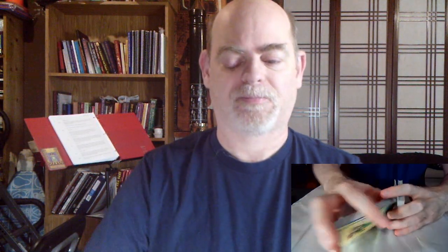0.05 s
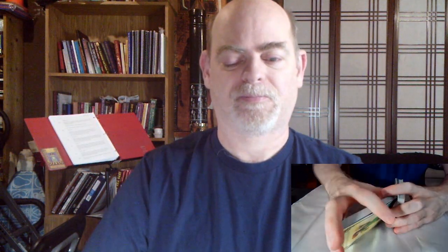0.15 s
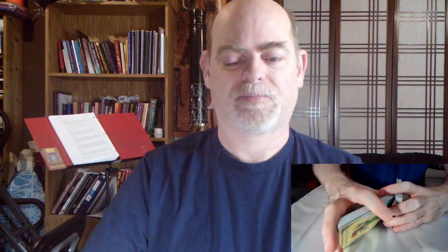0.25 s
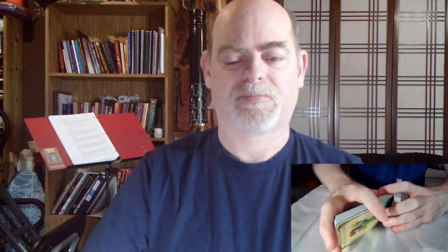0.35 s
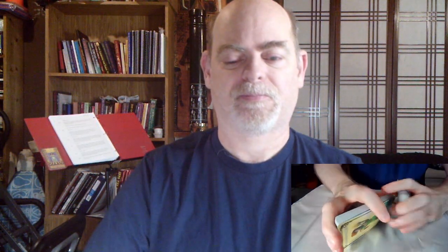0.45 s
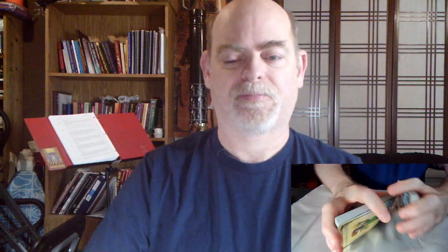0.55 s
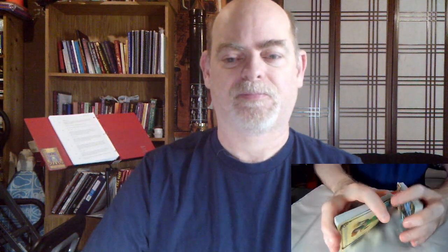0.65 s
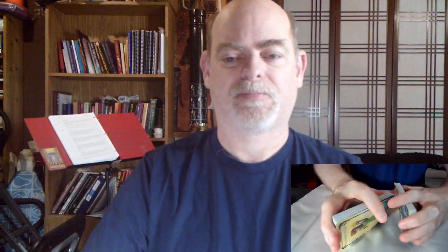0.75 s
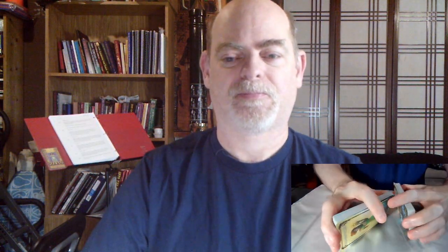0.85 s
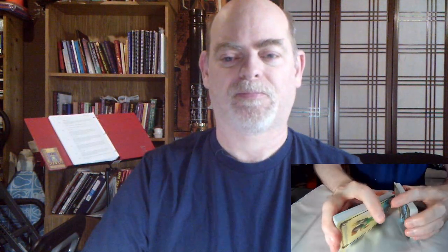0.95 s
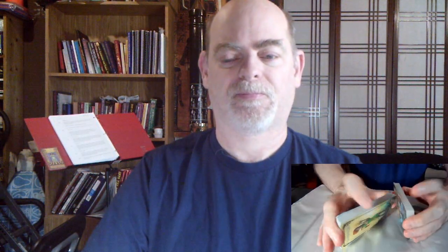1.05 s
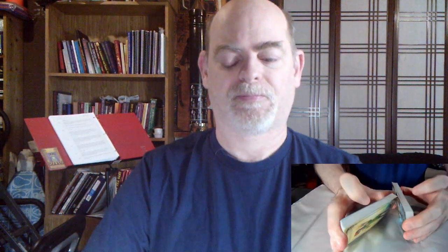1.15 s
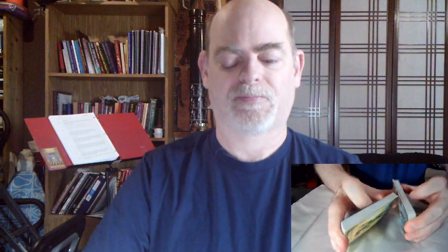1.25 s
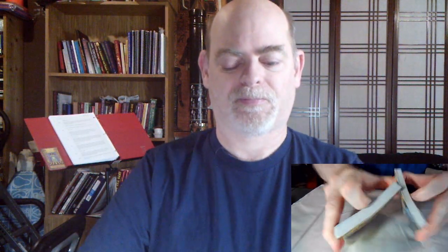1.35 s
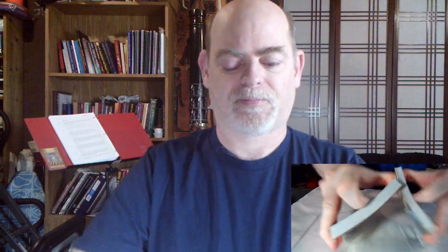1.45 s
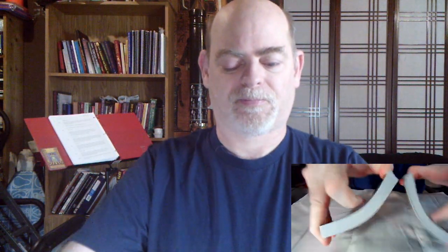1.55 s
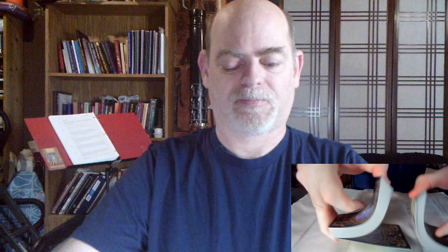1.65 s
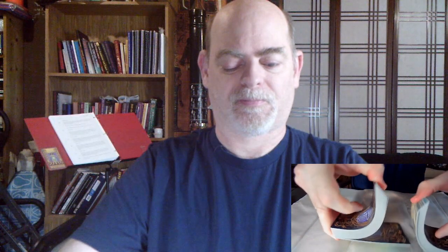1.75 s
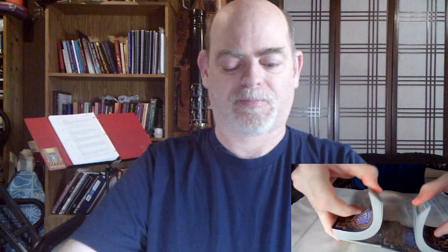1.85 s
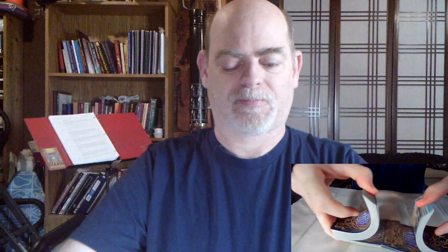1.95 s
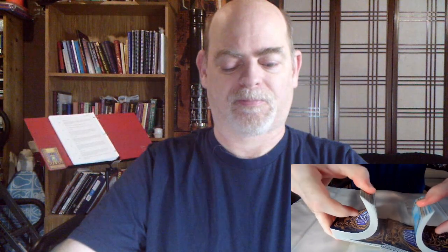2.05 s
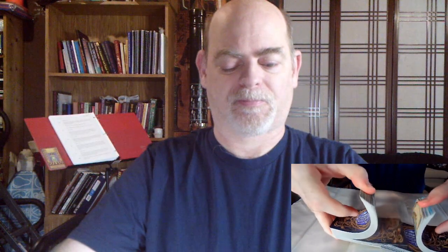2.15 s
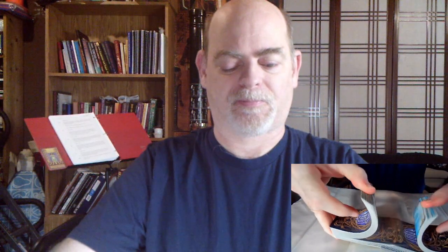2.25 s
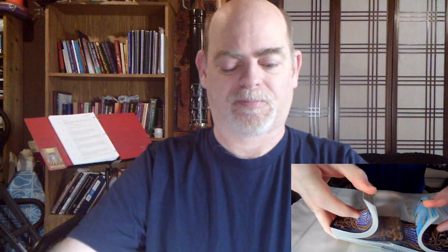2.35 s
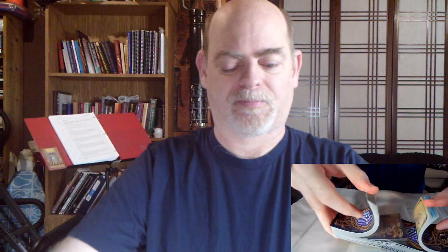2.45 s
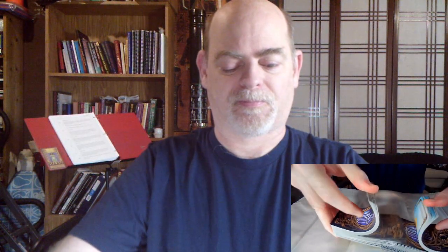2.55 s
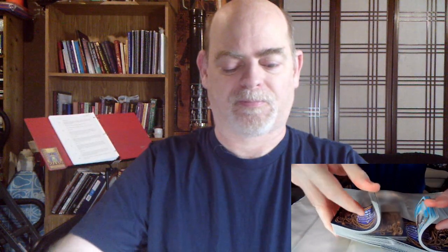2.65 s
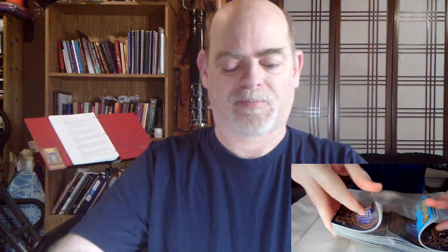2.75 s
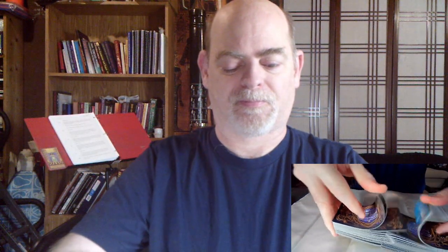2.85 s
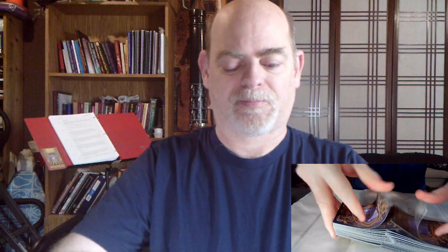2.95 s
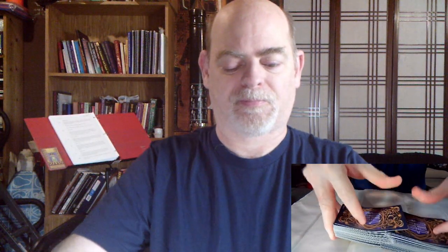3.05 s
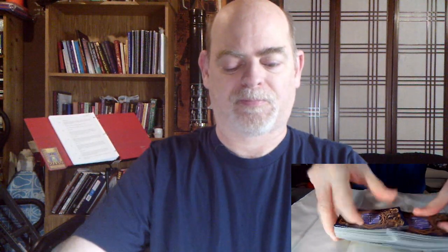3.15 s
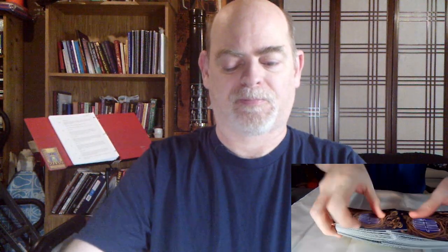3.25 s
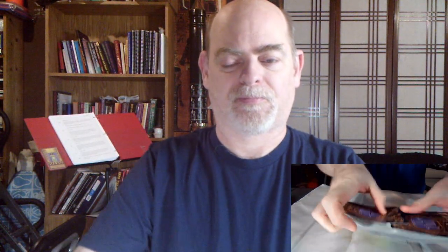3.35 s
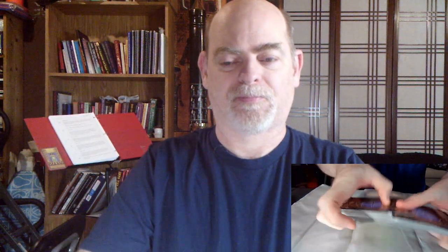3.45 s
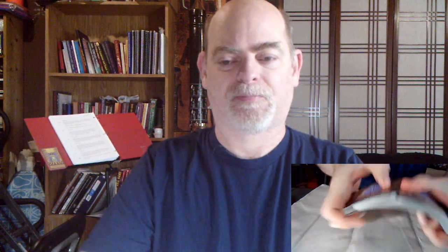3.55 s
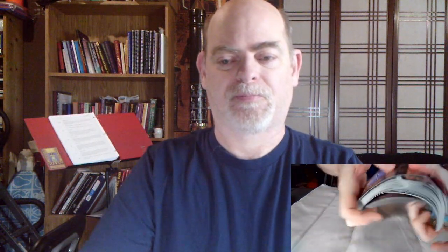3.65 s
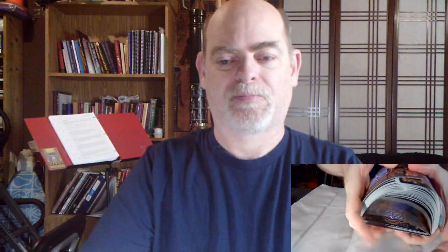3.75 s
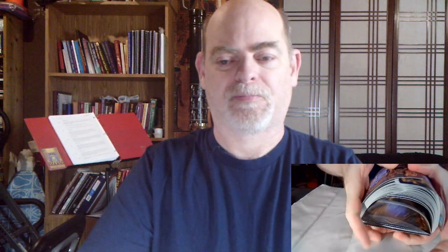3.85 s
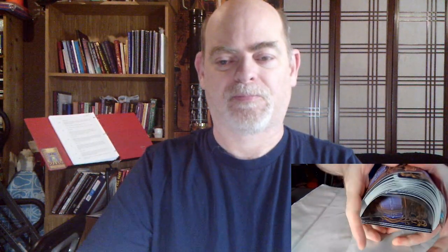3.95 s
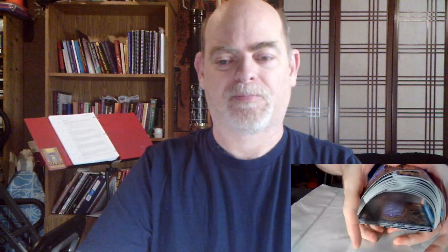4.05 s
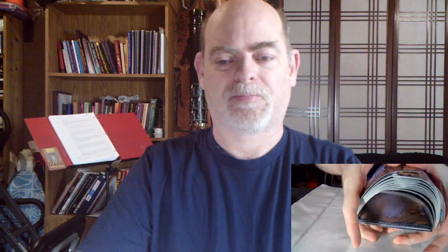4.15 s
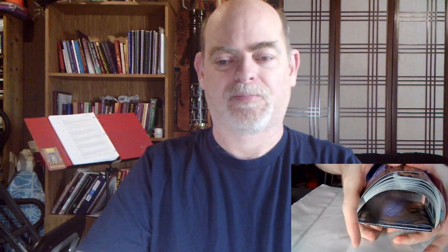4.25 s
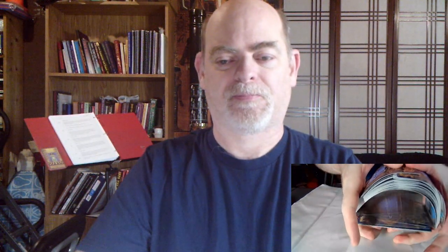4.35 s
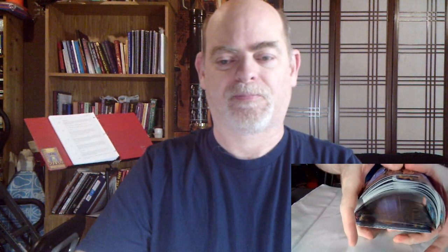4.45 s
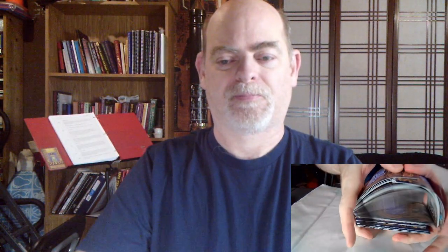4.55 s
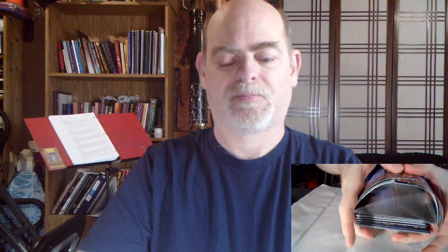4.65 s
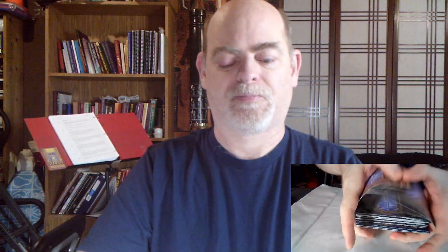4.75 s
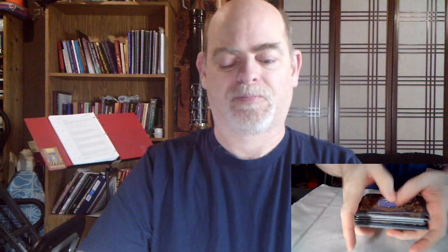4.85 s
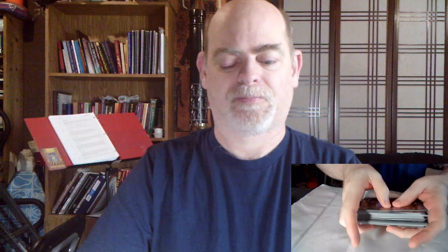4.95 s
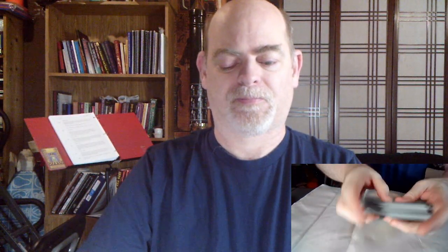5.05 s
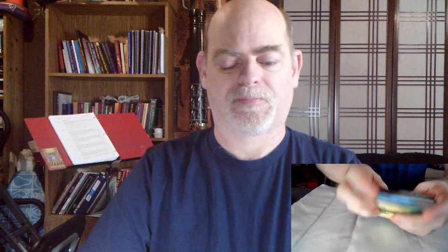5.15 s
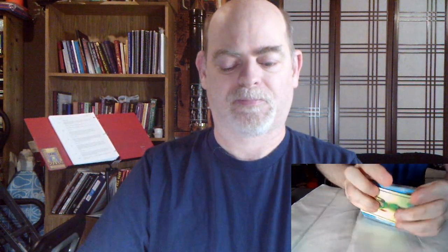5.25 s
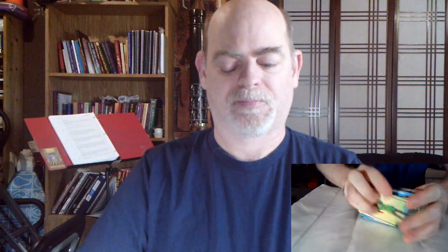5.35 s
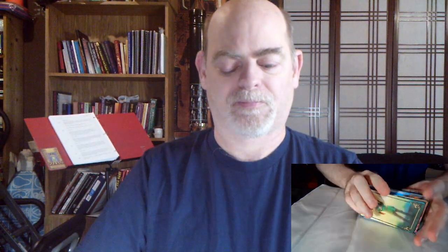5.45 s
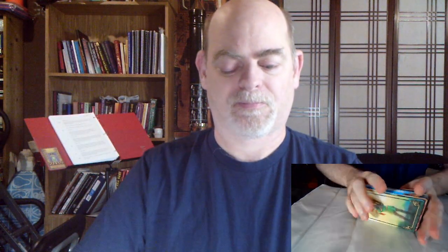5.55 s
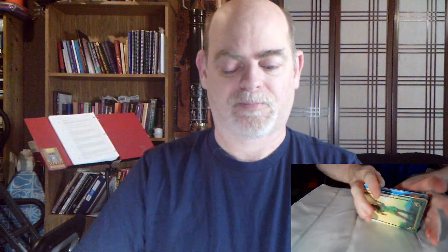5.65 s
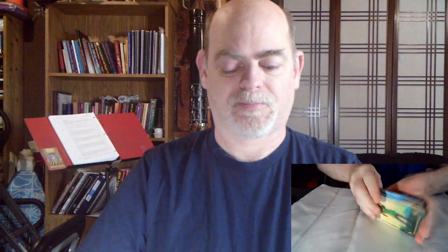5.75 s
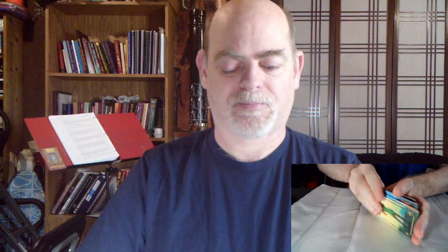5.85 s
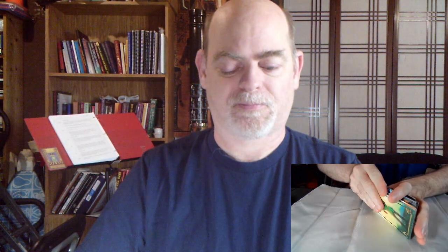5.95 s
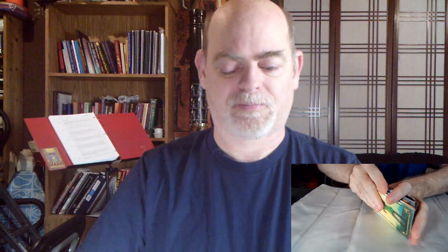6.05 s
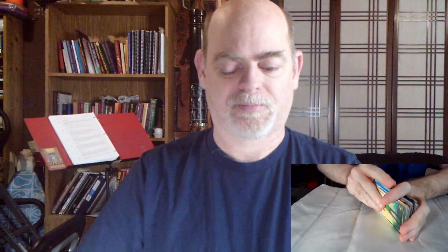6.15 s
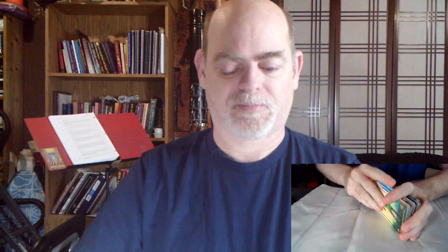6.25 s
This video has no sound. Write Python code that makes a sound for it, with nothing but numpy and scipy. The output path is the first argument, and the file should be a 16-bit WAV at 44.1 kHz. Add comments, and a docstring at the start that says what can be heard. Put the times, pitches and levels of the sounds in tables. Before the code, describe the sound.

Quiet handling and one low thump on a table lead into a sharp, uneven riffle of card corners, snapping and slapping over a low table rumble. A pause with soft bumps follows, then a gentle sliding purr that speeds into a brief crisp flutter. The deck is squared with light knocks. Close, fairly dry indoor pickup with short room echoes and steady faint noise.

```python
"""A small furnished room, close on a cloth-covered table that carries both the cards and the microphone.
A stiff deck is riffled, bridged and squared: card corners flick past the thumbs and slap down as noise
bursts through resonances, and sliding faces hiss as friction noise. Hands and deck thump the table, whose
top booms and whose frame rocks and sways. Room echoes follow the cards; a faint steady hush lies beneath."""
import sys
import numpy as np
from scipy import signal
from scipy.fft import rfft, irfft
from scipy.io import wavfile
from scipy.ndimage import uniform_filter1d

SR = 44100
rng = np.random.default_rng(int(sys.argv[2]) if len(sys.argv) > 2 else 0)


def output_pcm(signal):
    """Save a mono or channel-first signal as 16-bit PCM at the path in sys.argv[1].

    Samples are clipped to [-1, 1] before scaling.
    """
    pcm = np.clip(np.atleast_2d(signal).T, -1, 1) * 32767
    wavfile.write(sys.argv[1], SR, np.round(pcm).astype(np.int16))


N = 277410
T = np.arange(N) / SR  # [s]

# Cards heard singly, peak levels: (time [s], snap [dB], snap pitch [Hz], edge crackle above snap [dB],
# flat slap above snap [dB], contact [ms])
SINGLE_CARDS = [(1.371, -35, 2850, 3.5, -9, 0.31), (1.618, -53, 4000, 5.5, 2, 0.73),
                (1.662, -51, 2800, 2, 12, 4.1), (1.6921, -45, 4890, 14.5, 5, 0.15),
                (1.7164, -57, 2750, -7, 18.5, 1.5), (1.7484, -46, 2030, 1, 4.5, 0.22),
                (1.7863, -50.5, 2050, 6, 11, 0.62), (1.8076, -56, 2050, -1, 15.5, 0.94),
                (1.8208, -32.5, 2020, -5, 6.5, 0.57), (1.8451, -41, 2050, 7, 14.5, 0.77),
                (1.8763, -39.5, 2050, 0, 9.5, 16), (1.9024, -46, 2630, 15, 15.5, 0.17),
                (1.9465, -26, 3480, -3, -2.5, 0.52), (1.97, -32.5, 2770, 1, 5.5, 0.95),
                (1.99, -24, 4750, 8.5, -4, 0.51), (2.015, -36, 2280, 7, 7, 1.8),
                (2.0574, -23.5, 2600, 7, 0, 0.47), (2.08, -20.5, 4320, -6, -6.5, 2),
                (2.0907, -23.5, 2100, -5, -3, 3.4), (2.1362, -31.5, 2860, 10.5, 5, 0.41),
                (2.1594, -18.5, 2780, -14, -24, 3.4), (2.1664, -22, 2100, -7, -0.5, 10),
                (2.1964, -28, 1880, -9, -6, 1.3), (2.2278, -15, 2680, 1, -8.5, 0.48),
                (2.247, -35.5, 2050, 0, 9, 1.5), (2.259, -27, 1880, 0, -0.5, 1.3),
                (2.295, -41.5, 2050, 4, 12, 2.4), (2.328, -28.5, 1870, -10, -7, 2.3),
                (2.3459, -18.5, 4390, -2.5, -1, 1.5), (2.3558, -30, 3380, 6, -8, 2.1),
                (2.408, -40, 2050, -3, 8, 1.1), (2.421, -19, 2780, -4, -3, 0.48),
                (2.4593, -27, 2700, 1, 2.5, 1.5), (2.483, -33, 4000, -4, -7, 2.7),
                (2.498, -34, 2760, -11, 11, 3.6), (2.5287, -11.5, 4070, -4.5, -9, 0.5),
                (2.547, -32, 2050, 4, 8.5, 1.3), (2.5795, -21, 3950, -6, -1.5, 1.6),
                (2.6016, -26, 2050, -2, 4, 4.8), (2.647, -38, 4600, 14.5, -2, 2.4),
                (2.662, -29, 2050, -19, 9.5, 2.1), (2.691, -24.5, 2720, 2, 3.5, 0.17),
                (2.7389, -18.5, 2030, -1.5, 1, 0.22), (2.7583, -22.5, 1980, 0, 4, 5.2),
                (2.7745, -22.5, 4650, 1.5, 0.5, 3.5), (2.8198, -24, 2000, 4, -2, 0.93),
                (2.8402, -25.5, 4750, 4, 8, 1.14), (2.875, -34, 4770, 11.5, -5, 2.1),
                (2.8848, -30, 2670, 3.5, 6.5, 7.6), (2.9145, -25.5, 2450, 1.5, -0.5, 1.1),
                (2.9429, -31.5, 2680, 6.5, 3.5, 1.5), (2.9627, -34.5, 2050, -1, 2.5, 3.5),
                (2.9821, -36.5, 2050, 9.5, -0.5, 1.33), (3.2437, -50, 3930, 6, -11, 0.7),
                (3.822, -45, 2690, 2.5, -26.5, 2.7), (4.0895, -53, 2220, 2, 7, 3.2),
                (4.122, -44.5, 1870, 11, -2, 0.37), (4.1783, -45, 2060, 2, 4.5, 4),
                (4.225, -42.5, 2050, 0.5, -0.5, 4.9), (4.274, -28.5, 3500, -1.5, -17, 1.1),
                (4.29, -41, 2630, -12, -2, 2.1), (4.3001, -49, 3980, 17.5, -2, 0.91),
                (4.4392, -41.5, 2060, -9, 4, 1.4), (4.517, -32.5, 1900, -20, -1, 2.1),
                (4.554, -28, 2050, 0.5, -2, 1.1), (4.561, -33.5, 2050, 7, 0, 0.82),
                (4.5765, -38.5, 2761, 6, 8.5, 2.53), (4.5866, -20.5, 4400, -2, -3, 0.56),
                (4.5984, -36, 2050, 6, -11, 1.6), (4.6135, -41, 2750, 3, 11, 2.2),
                (4.621, -36, 2560, -4, 7, 1.2), (4.6276, -30, 2090, 3, 5.5, 2.8),
                (4.6419, -36, 2350, 5, 7, 0.41), (4.6827, -29.5, 2800, 3, -9, 2.8),
                (4.6953, -30.5, 4300, -16, 2.5, 2.9), (4.7037, -36, 2680, -5, -1, 2.4),
                (4.7334, -37.5, 2610, 4.5, 4.5, 4.3), (4.789, -45, 2000, 2, 2, 0.85),
                (5.605, -38.5, 2300, 1, -5.5, 0.14)]
# Softer cards falling between them: (start [s], end [s], snap at start [dB], snap at end [dB])
SOFT_RUNS = [(1.626, 1.812, -47.5, -58), (1.84, 2.989, -38.5, -36), (3.038, 3.195, -64, -58),
             (3.25, 3.5, -56, -66), (3.69, 4.071, -56, -66), (4.065, 4.459, -52.5, -49),
             (4.462, 4.79, -43, -46.5)]
# Density of each soft run: (rate [cards/s])
SOFT_RUN_RATES = [40, 45, 20, 30, 40, 45, 90]
# The average soft card and its chance spread; edge and slap stand relative to the snap
SOFT_EDGE_DB, SOFT_SLAP_DB, SOFT_CONTACT_MS, SOFT_SNAP_HZ = -0.5, 0, 2, 2590
SOFT_SPREAD_DB, SOFT_COLOUR_SPREAD_DB = 3, 5
# Resonances of a card: (frequency [Hz], width [Hz], level [dB])
SNAP_MODES = [(2000, 1200, 5.5), (3100, 640, 8.5), (3185, 88, 11), (4120, 580, 6)]  # corner coming free
EDGE_MODES = [(5550, 800, -3), (6700, 570, 2), (8530, 1530, -1.5), (12600, 4900, -7.5),
              (16540, 2500, -18.5)]  # crackle of the edge
SLAP_MODES = [(503, 333, -9), (839, 325, -1), (1030, 294, 0), (1432, 346, -3)]  # card landing flat
CORNER_DB = 5  # each card's own resonance stands out among the shared ones

# Card faces rubbing in the riffle, then in the bridge: (time [s], fine hiss [dB], coarse scrape [dB])
RIFFLE_RUB = [(1.781, -82, -75), (1.891, -58.5, -57.5), (2.06, -52.5, -55.5), (2.17, -50, -45),
              (2.24, -53, -50.5), (2.514, -60, -65.5), (2.544, -49, -47), (2.629, -61.5, -55),
              (2.78, -56.5, -47), (2.903, -52, -44), (2.98, -72.5, -64), (3.0, -83, -73), (3.2, -85, -89)]
BRIDGE_RUB = [(3.552, -81, -88), (3.66, -71, -64.5), (3.697, -57, -62), (3.746, -55.5, -57),
              (3.891, -53, -61), (4.136, -50, -58.5), (4.26, -58, -63), (4.29, -54, -59),
              (4.365, -54, -58.5), (4.46, -56, -66), (4.5, -48, -53), (4.66, -56, -48.5), (4.749, -44, -52),
              (4.785, -55, -57.5), (4.805, -71, -65), (4.914, -90, -90)]
# Fingers brushing the cards: (time [s], held [s], fine hiss [dB], coarse scrape [dB])
FINGER_BRUSHES = [(0.01, 0.064, -66.5, -66), (0.314, 0.0076, -70, -75), (1.003, 0.015, -75, -75),
                  (1.292, 0.0092, -80, -74), (1.387, 0.0046, -85, -83), (1.66, 0.021, -78, -62),
                  (3.258, .01, -80, -75), (3.3, 0.012, -67.5, -78), (3.36, 0.13, -75.5, -78),
                  (5.12, 0.038, -65, -93), (5.233, 0.17, -73.5, -73.5), (5.617, 0.0084, -69, -75),
                  (5.76, 0.026, -73, -68.5), (5.897, 0.029, -73.5, -70), (6.111, 0.029, -74, -73),
                  (6.27, .02, -68.5, -76)]
RISE_DB_PER_S, FALL_DB_PER_S = 293, 263
DRAG_S, DRAG_HELD_S, DRAG_DB, DRAG_STOP_DB_PER_S = 5.125, 0.097, -58.5, 1400  # one drag on the cloth
# Resonances under friction: (frequency [Hz], width [Hz], level [dB])
HISS_MODES = [(5700, 1000, -6), (6900, 800, 1.5), (8500, 1400, .5), (12200, 3000, -1), (14800, 2000, -3)]  # fine hiss of the glossy faces
SCRAPE_MODES = [(1950, 450, 1), (2920, 330, 0.1), (4250, 2600, -5)]  # coarse scrape
FACE_MODES = [(478, 230, -5), (1203, 520, -6)]  # card faces shaken by the scrape
CLOTH_MODES = [(1110, 300, -1), (2780, 350, 0), (4400, 700, -11), (6600, 1500, -17)]  # table cloth

# Deck or hand meeting the table, peak levels:
# (time [s], top [dB], frame rock [dB], push [ms], knock [dB])
TABLE_THUMPS = [(0.617, -38, -63, 7.7, -70.5), (0.669, -12.5, -41.5, 8.9, -39),
                (1.692, -37.5, -37.5, 10.3, -43.5), (1.879, -24, -40, 8.8, -49),
                (2.511, -24.5, -32, 13.5, -54), (3.29, -40.5, -48, 9.8, -75),
                (3.345, -37.5, -46, 15.5, -72), (3.526, -32.5, -55, 13.6, -80),
                (3.747, -24, -41, 10.1, -50), (4.146, -44, -47, 4.3, -89), (5.221, -37, -33, 1.2, -43),
                (5.241, -37, -48, 4.4, -52), (5.291, -26.5, -52, 2.8, -39.5), (5.31, -45, -38, 9.8, -55),
                (6.067, -39.5, -53, 6, -66.5)]
# Hands working on the table: (time [s], top [dB], frame rock [dB], sway of the legs [dB])
HAND_TREMOR = [(0.0, -49, -51, -39), (0.33, -52.5, -54, -44), (0.72, -50.5, -49.5, -36),
               (1.0, -52, -54, -47.5), (1.25, -49, -53, -37), (1.56, -54.5, -71, -58),
               (1.73, -46, -39, -44), (1.9, -36.5, -33, -31.5), (2.07, -34.5, -29.5, -30),
               (2.26, -33, -34, -32), (2.49, -28.5, -49, -38), (2.58, -27.5, -28, -26.5),
               (2.8, -26.5, -24, -24.5), (2.96, -40.5, -27, -35), (3.15, -55, -51, -30.5),
               (3.28, -52, -37.5, -43.5), (3.72, -54, -52, -43), (3.85, -50, -41.5, -35),
               (4.12, -52, -54, -47.5), (4.69, -47, -44, -51), (4.89, -52, -54.5, -42),
               (5.17, -51.5, -54, -49.5), (5.36, -50, -39, -26.5), (5.66, -50, -49, -50.5),
               (6.29, -53.5, -48, -50)]
# Resonances of the table: (frequency [Hz], width [Hz], level [dB])
TOP_MODES = [(80, 18, -17), (117, 15, -3.5), (128, 8, 0), (152, 30, -17), (238, 30, -17), (320, 60, -25)]  # booming table top
ROCK_MODES = [(31, 10, 0), (44, 11, -1)]  # rocking frame
KNOCK_MODES = [(240, 60, -4), (330, 80, 0), (500, 250, -10), (950, 500, -19)]  # contact knock
ROCK_CUT_HZ, TOP_CUT_HZ = 53, 52  # the frame cannot follow above, the top hardly radiates below
KNOCK_CUT_HZ = 1500  # cloth and skin leave the knock dull
SWAY_HZ, SWAY_DRIFT_HZ = 21, 1.18

ROOM_T60_S, ROOM_DB, ROOM_TREBLE_T60_S = 0.33, -17, 0.2
# Colour of the steady background: (frequency [Hz], relative density [dB per Hz])
HUSH_COLOUR = [(45, -17.5), (62, 2.5), (100, -17), (170, 3.5), (291, -31), (410, -8), (601, -17.5),
               (882, -13), (952, -13.5), (1320, -14), (1790, -26.5), (13900, -43.5), (15600, -50),
               (16500, -45.5)]
HUSH_DB = -61
RECORDER_TOP_HZ = 16000


def flicks(rise=0.25, slap_longer=1.05, crack_ms=4.76, lead_db=-17, flutter_db=-18, flutter_ms=17.4):
    """Each card drags off the thumb, cracks free in a rough burst, slaps flat and flutters still."""
    before = 130  # samples ahead of the release
    ms = np.arange(-before, 1900) / SR * 1000
    after = np.maximum(ms, 0)
    flutter = undb(flutter_db) * np.exp(-after / flutter_ms) * (1 - np.exp(-after))
    out = np.zeros(N)
    for s, snap_db, snap_hz, edge_db, slap_db, contact_ms in SINGLE_CARDS + patter():
        rough = rng.standard_normal(len(ms))
        rough[before] = crack_ms / max(contact_ms, .2)  # a short contact starts with one sharp step
        lead_ms = rng.uniform(0, 3.2)
        lead = undb(lead_db) * (ms > -lead_ms) * (ms < 0)
        parts = ((SNAP_MODES, True, 0, 1), (EDGE_MODES, False, edge_db, 1),
                 (SLAP_MODES, False, slap_db, slap_longer))
        for modes, is_snap, db, longer in parts:
            length = max(contact_ms, .1) * longer
            swell = 1 - .5 * np.exp(-after / (rise * length))
            contact = (ms >= 0) * swell * np.exp(-(after / length) ** 2)
            card = bent_card(modes, snap_hz, is_snap)
            burst = ring((contact + flutter + lead) * rough, card)
            add(out, s + ms[0] / 1000, peak(burst, snap_db + db))
    return out


def bent_card(modes, snap_hz, is_snap, detune=.03, scatter_db=1.5):
    """Every card is bent and held a little differently; its free length sets the pitch of the snap."""
    hz, width, gain_db = np.transpose(modes)
    chance = rng.standard_normal((2, len(modes))).clip(-2, 2)
    nearest = np.argmin(np.abs(np.log(hz / snap_hz)))
    corner = is_snap & (np.arange(len(hz)) == nearest)
    card_hz = np.where(corner, snap_hz, hz * (1 + detune * chance[0]))
    return zip(card_hz, width, gain_db + scatter_db * chance[1] + CORNER_DB * corner)


def patter():
    """Soft cards in the columns of SINGLE_CARDS, each a chance variation of the average one."""
    rows = []
    for (start, end, start_db, end_db), rate in zip(SOFT_RUNS, SOFT_RUN_RATES):
        slots = np.linspace(0, 1, round(rate * round(end - start, 1)), endpoint=False)
        place = slots + rng.random(len(slots)) / len(slots)  # one card at random in each slot
        chance = rng.standard_normal((len(slots), 5)).clip(-2, 2).T
        rows += zip(start + place * (end - start),
                    start_db + place * (end_db - start_db) + SOFT_SPREAD_DB * chance[0],
                    SOFT_SNAP_HZ * 0.92 ** chance[1],
                    SOFT_EDGE_DB + SOFT_COLOUR_SPREAD_DB * chance[2],
                    SOFT_SLAP_DB + SOFT_COLOUR_SPREAD_DB * chance[3],
                    SOFT_CONTACT_MS * 2.28 ** chance[4])
    return rows


def slide(face_db=-10.0):
    """Glossy faces hiss and scrape over each other and the cloth; the scrape also shakes the card faces."""
    brushes = sum(stroke(s, held_s) * undb(db)[:, None] for s, held_s, *db in FINGER_BRUSHES)
    fine, coarse = brushes + curves(RIFFLE_RUB) + curves(BRIDGE_RUB)
    # the lower and upper hiss catch and slip independently
    hiss = (ring(fine * rub(), HISS_MODES[:3]) + ring(fine * rub(), HISS_MODES[3:])) / np.sqrt(2)
    rubbing = coarse * rub()
    scrape = ring(rubbing, SCRAPE_MODES) + undb(face_db) * ring(rubbing, FACE_MODES)
    drag = undb(DRAG_DB) * stroke(DRAG_S, DRAG_HELD_S, DRAG_STOP_DB_PER_S)
    return hiss + scrape + ring(drag * rub(), CLOTH_MODES)


def rub():
    """Friction noise that catches and slips, with a fine grain and small ticks of card edges letting go."""
    catch_db, grit_db, ticks_per_s, tick_db = 2., 2.5, 130, 9
    hits = rng.random(N) < ticks_per_s / SR
    ticks = signal.lfilter([1], [1, -.97], hits)  # each dies in about a millisecond
    level_db = catch_db * walk(30.) + grit_db * walk(500.) + tick_db * ticks.clip(0, 1)
    return unit(undb(level_db) * rng.standard_normal(N))


def stroke(s, held_s, fall_db_per_s=FALL_DB_PER_S):
    """Gain of one movement: swells until s, holds, fades."""
    swell_db = RISE_DB_PER_S * (T - s)
    fade_db = fall_db_per_s * (s + held_s - T)
    return undb(np.minimum(0, np.minimum(swell_db, fade_db)))


def table(knock_ms=8.4):
    """Thumps and the tremor of working hands ring the top and rock the frame under the microphone."""
    tremor = curves(HAND_TREMOR)[:2] * rng.standard_normal((2, N))
    out = table_top(tremor[0]) + frame_rock(tremor[1])
    ms = T[:SR] * 1000
    dull = signal.butter(4, KNOCK_CUT_HZ, fs=SR, output="sos")
    for s, top_db, rock_db, push_ms, knock_db in TABLE_THUMPS:
        push = np.sin(np.pi * np.clip(ms / push_ms, 0, 1)) ** 2  # a soft hand pushes longer
        contact = (1 - np.exp(-ms)) * np.exp(-ms / knock_ms) * rng.standard_normal(len(ms))
        knock = signal.sosfilt(dull, ring(contact, KNOCK_MODES))
        thump = peak(table_top(push), top_db) + peak(frame_rock(push), rock_db)
        add(out, s, thump + peak(knock, knock_db))
    return out


def table_top(force):
    """The top booms in its resonances and hardly radiates the lowest bass."""
    high = signal.butter(2, TOP_CUT_HZ, "high", fs=SR, output="sos")
    return signal.sosfilt(high, ring(force, TOP_MODES))


def frame_rock(force):
    """The heavy frame rocks in its resonances and follows only slow forces."""
    low = signal.butter(4, ROCK_CUT_HZ, fs=SR, output="sos")
    return signal.sosfilt(low, ring(force, ROCK_MODES))


def sway():
    """The legs swing as a very low sine; leaning hands shift its rate a little."""
    hz = SWAY_HZ + SWAY_DRIFT_HZ * walk(11.0)
    return np.sqrt(2) * curves(HAND_TREMOR)[2] * np.sin(2 * np.pi * np.cumsum(hz) / SR)


def room(x):
    """Diffuse echoes of shelves and walls; the treble dies sooner."""
    t = T[:SR // 2]
    noise = rng.standard_normal(len(t)) * (t > .003)  # the first echoes take 3 ms
    low = signal.sosfilt(signal.butter(2, 3000, fs=SR, output="sos"), noise)
    treble = noise - low
    tail = low * undb(-60 * t / ROOM_T60_S) + treble * undb(-60 * t / ROOM_TREBLE_T60_S)
    return undb(ROOM_DB) * signal.fftconvolve(x, tail / np.sqrt(np.sum(tail ** 2)))[:N]


def hush():
    """Steady noise of room and microphone, white noise coloured by spectrum; its level wavers slightly."""
    hz, db = np.transpose(HUSH_COLOUR)
    bins_hz = np.arange(N // 2 + 1) * SR / N
    colour = undb(np.interp(np.log(bins_hz + 1), np.log(hz), db))
    noise = unit(irfft(rfft(rng.standard_normal(N)) * colour, N))
    return undb(HUSH_DB + 0.24 * walk(27.0)) * noise


def undb(db):
    """Amplitude gain of a level in dB."""
    return 10 ** (np.asarray(db) / 20)


def unit(x):
    """Scale to rms 1."""
    return x / np.sqrt(np.mean(x ** 2))


def peak(x, db):
    """Scale to a peak level in dB."""
    return x * undb(db) / np.max(np.abs(x))


def curves(table):
    """Gains over time from the dB columns of a table; silent outside it."""
    s, *columns = np.transpose(table)
    inside = (T >= s[0]) * (T <= s[-1] + .01)
    return [undb(np.interp(T, s, column)) * inside for column in columns]


def ring(x, modes):
    """Drive a set of resonances; white noise of rms 1 comes out near rms 1."""
    out, power = 0, 0
    for k, (hz, width, db) in enumerate(modes):
        b, a = signal.iirpeak(hz, hz / width, SR)
        out = out + (-1) ** k * undb(db) * signal.lfilter(b, a, x)  # neighbours in opposite sign
        power += undb(db) ** 2 * np.pi * width / SR
    return out / np.sqrt(power)


def walk(rate):
    """Random levels, rate of them a second, slewed from one to the next; rms 1."""
    k = int(SR / rate)
    steps = np.repeat(rng.standard_normal(N // k + 1), k)
    return unit(uniform_filter1d(steps, k)[:N])


def add(track, s, burst):
    """Mix a burst into a track at time s."""
    i = int(s * SR)
    track[..., i:i + burst.shape[-1]] += burst[..., :N - i]


def scene():
    """Cards reach the microphone through the air and the room, the table through its stand."""
    cards = flicks() + slide()
    return (cards + room(cards) + table() + sway() + hush())[None]


def record(dry):
    """The recorder cuts the top with a steep low-pass."""
    return signal.sosfilt(signal.ellip(8, .2, 60, RECORDER_TOP_HZ, fs=SR, output="sos"), dry)


dry = scene()
out = record(dry)
output_pcm(out)
```